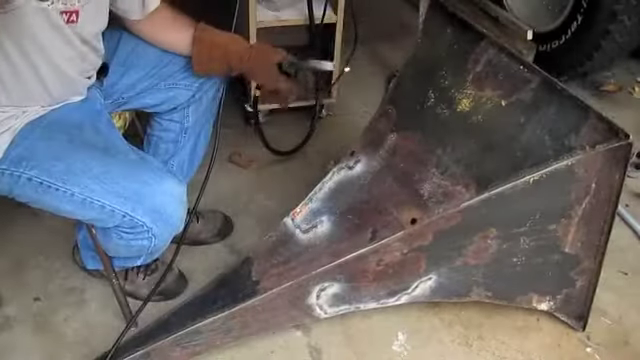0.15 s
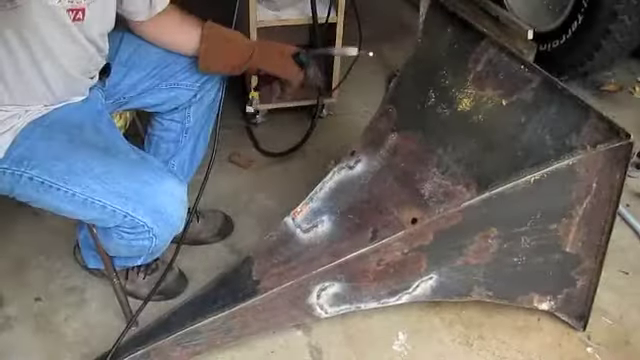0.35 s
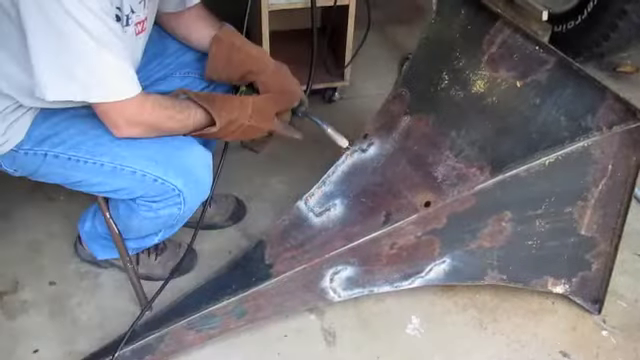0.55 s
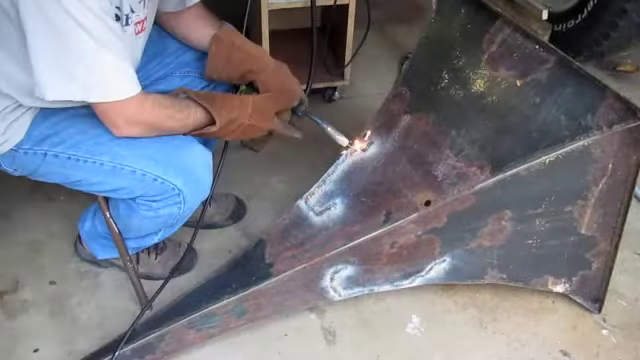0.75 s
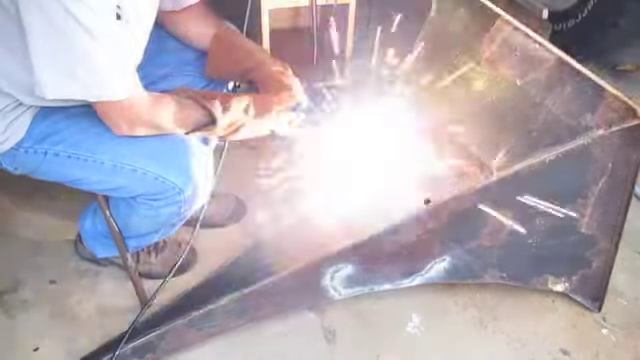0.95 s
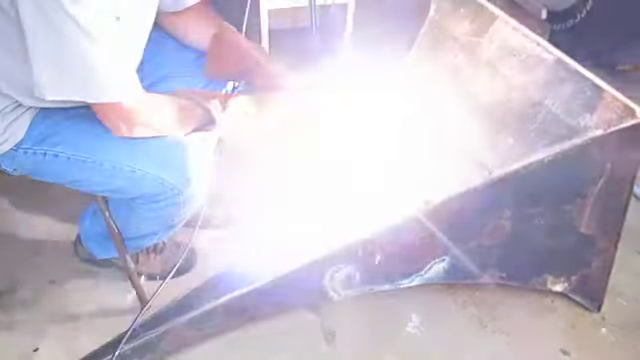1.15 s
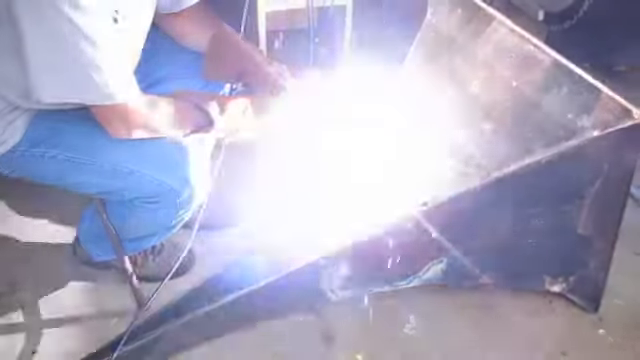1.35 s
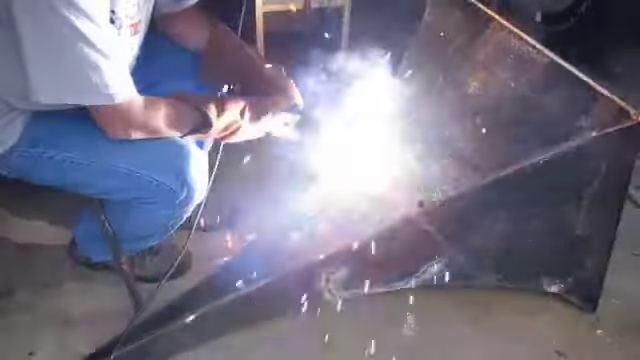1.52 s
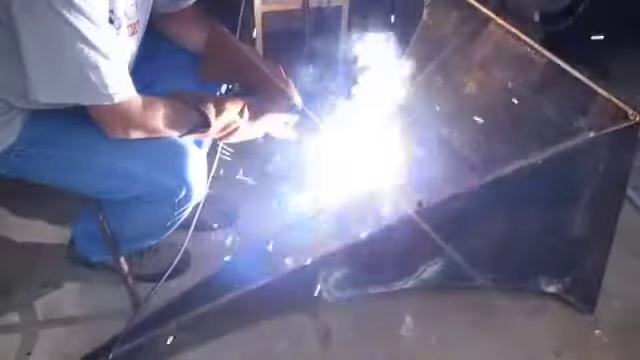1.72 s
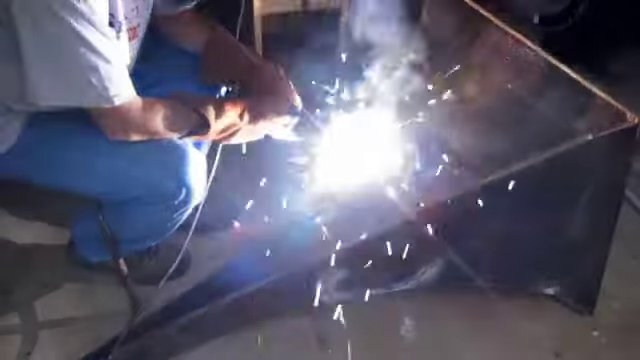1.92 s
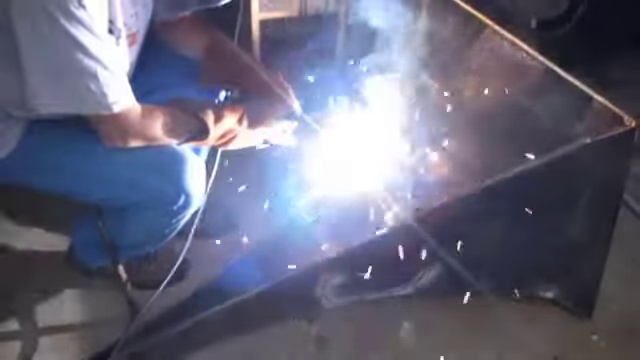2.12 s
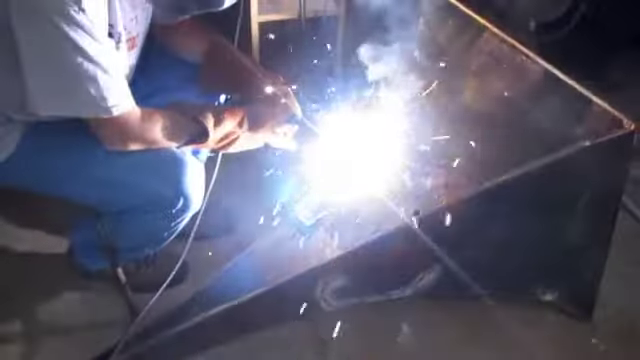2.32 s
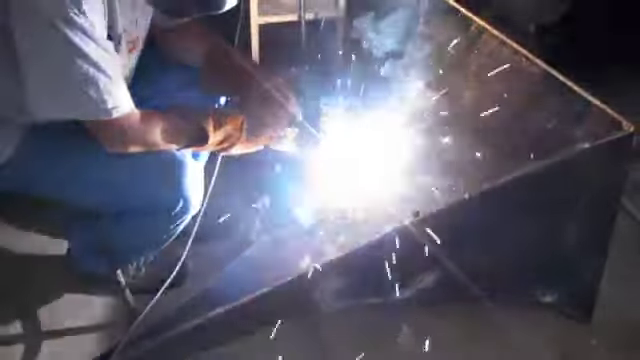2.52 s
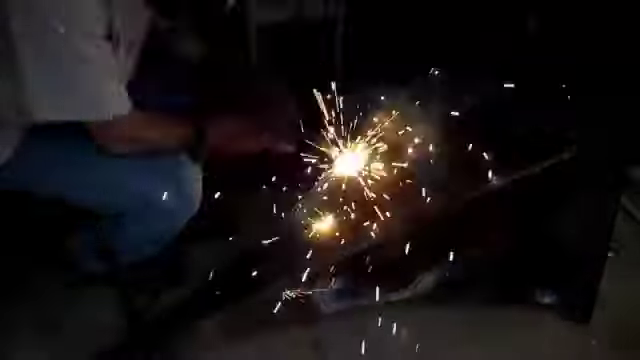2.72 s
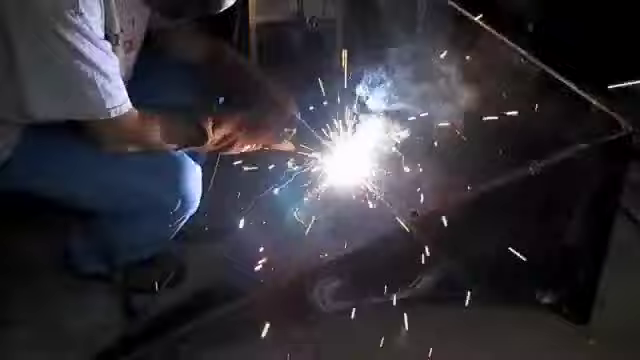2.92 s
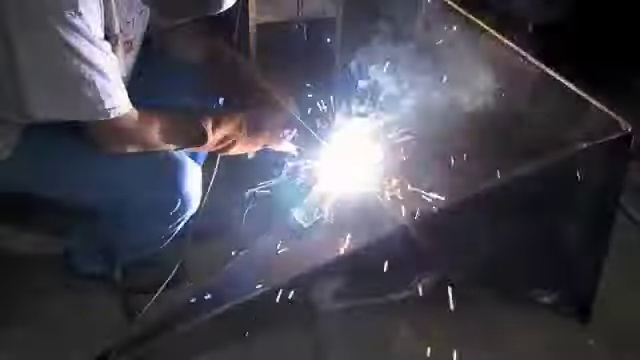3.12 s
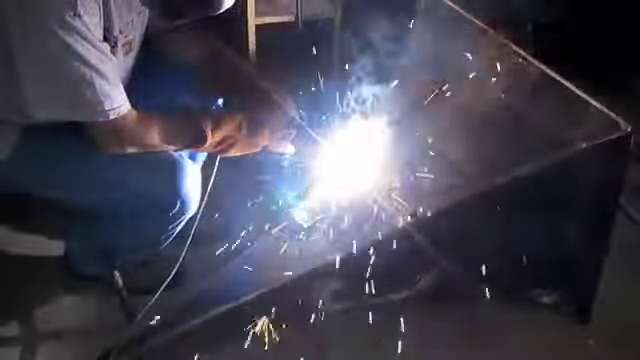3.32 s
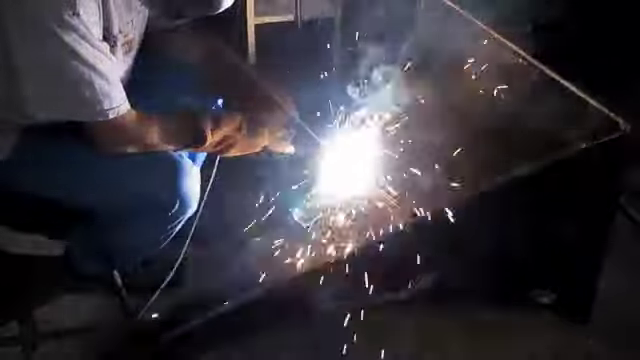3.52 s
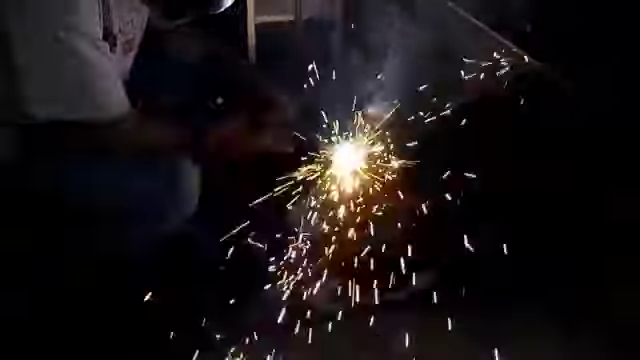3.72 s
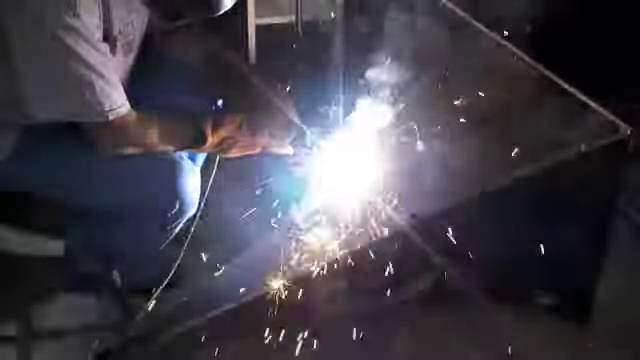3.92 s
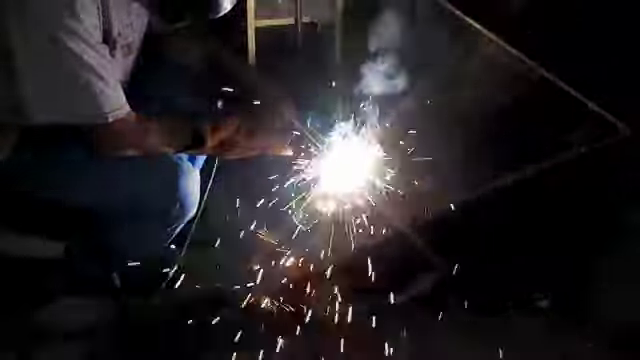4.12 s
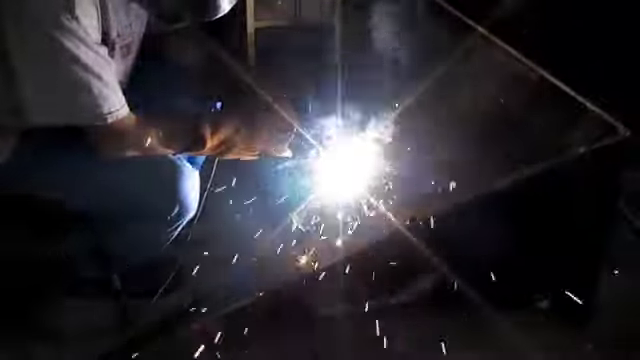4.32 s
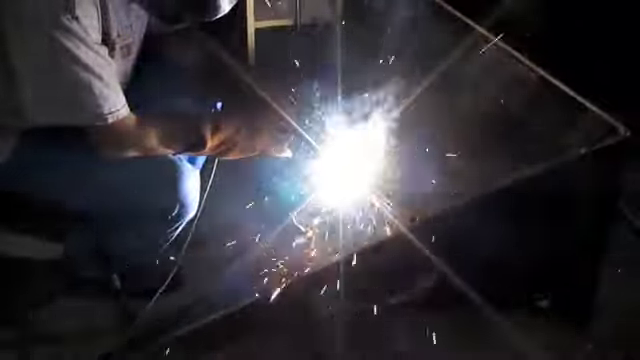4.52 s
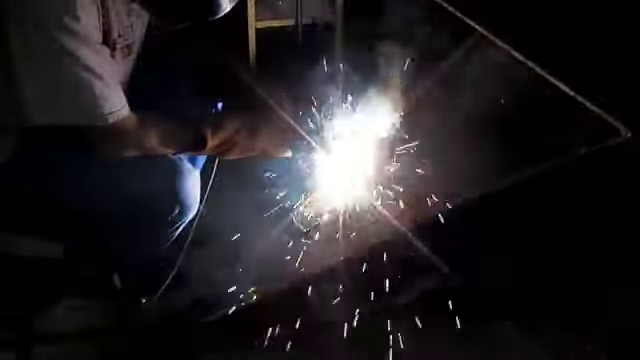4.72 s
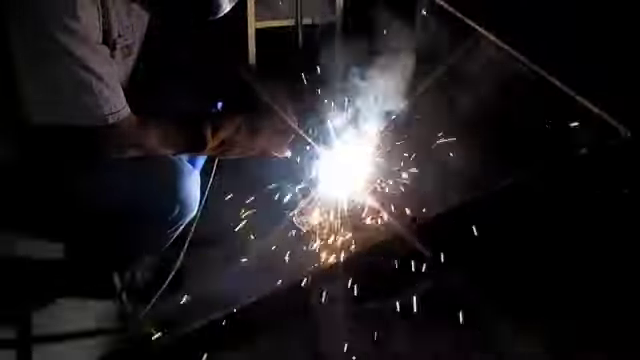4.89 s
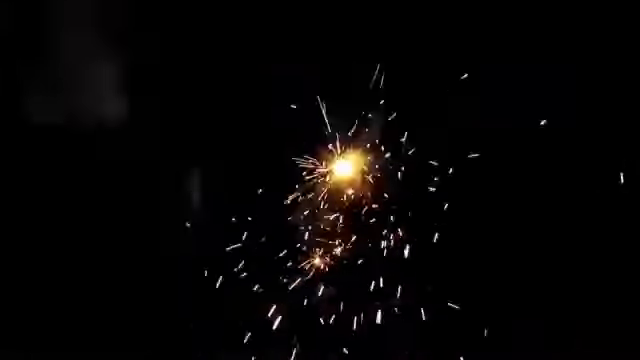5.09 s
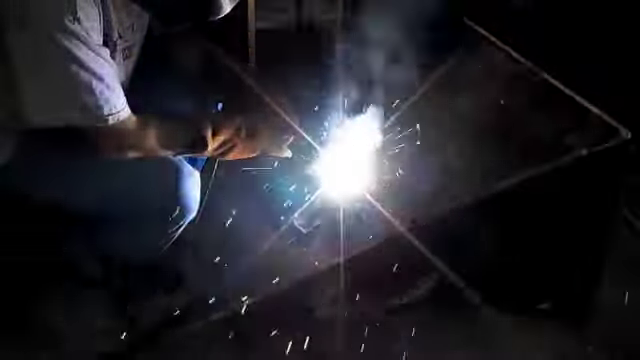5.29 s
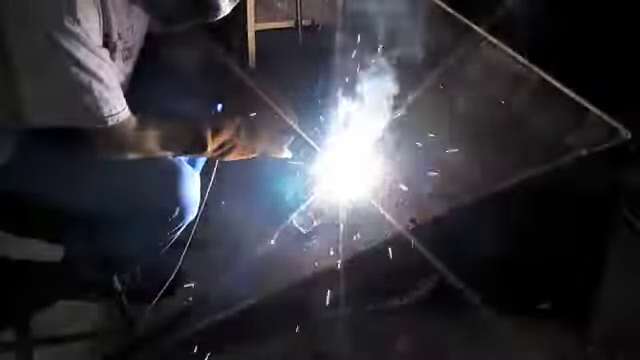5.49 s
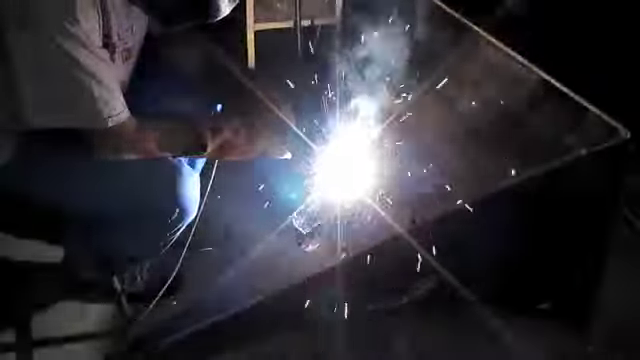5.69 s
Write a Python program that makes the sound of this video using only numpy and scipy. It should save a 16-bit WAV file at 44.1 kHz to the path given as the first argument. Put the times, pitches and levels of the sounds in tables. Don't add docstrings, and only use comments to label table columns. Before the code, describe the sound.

After under a second of soft fan air, a wire-feed welder strikes and spits harsh buzzing crackle and hard pops on ringing sheet steel.

```python
import sys
import numpy as np
from scipy import signal
from scipy.fft import rfft, irfft
from scipy.io import wavfile

SR = 44100
rng = np.random.default_rng(int(sys.argv[2]) if len(sys.argv) > 2 else 0)


def gain_from_db(level_db):
    decades = np.asarray(level_db, float) / 20
    return 10 ** decades


def materialize(psi):
    bounded = np.clip(np.atleast_2d(psi).T, -1, 1)
    quanta = np.round(bounded * 32767).astype(np.int16)
    wavfile.write(sys.argv[1], SR, quanta)


N = 253575
MAINS_HZ = 120


def evened(x):
    return x / np.sqrt(np.mean(x ** 2) + 1e-20)


def read(points, hz):
    f, value = np.transpose(points)
    return np.interp(np.log(hz + 1), np.log(f + 1), value)


def curve(rows, column):
    rows = np.array(rows)
    return np.interp(np.arange(N) / SR, rows[:, 0], rows[:, column])


def wander(cutoff_hz, count=1):
    b, a = signal.butter(2, cutoff_hz, fs=SR)
    return evened(signal.lfilter(b, a, rng.standard_normal((count, N))))


def paired(x, likeness):
    a, b = rfft(x)
    c = np.clip(read(likeness, np.fft.rfftfreq(x.shape[1], 1 / SR)), 0, 1)
    shared, opposed = np.sqrt((1 + c) / 2), np.sqrt((1 - c) / 2)
    return irfft([shared * a + opposed * b, shared * a - opposed * b], x.shape[1])


def bells(rows, hz):
    return sum(db / (1 + (2 * (hz - f) / width) ** 2) for f, width, db in rows)


# (time [s], level [dB])
FAN_LEVEL = [
    (0, -56),
    (.1, -55),
    (.45, -52),
    (.66, -53),
    (.86, -50.5),
    (.9, -54),
]
# (frequency [Hz], level [dB])
FAN_AIR_SPECTRUM = [(40, -37), (200, -19), (300, -10), (550, -14.5), (1300, -17.5), (2900, -21.5),
                    (4000, -28.5), (9000, -35.5), (15000, -54)]
# (frequency [Hz], level [dB])
BLADE_TONES = [(360.7, -57), (549.1, -47.5), (823.6, -47), (1098, -53.5), (1378, -55.5), (1647, -51.5),
               (2196, -59), (2476, -57), (2751, -64)]
# (frequency [Hz], coherence [0-1])
FAN_COHERENCE = [(60, 0.29), (380, 0.76), (2380, 0.44), (15000, 0.44)]


def fan():
    noise = rng.standard_normal((2, N))
    colour = gain_from_db(read(FAN_AIR_SPECTRUM, np.fft.rfftfreq(N, 1 / SR)))
    air = evened(paired(irfft(rfft(noise) * colour, N), FAN_COHERENCE))
    warped_s = np.cumsum(1 + 0.0139 * wander(24.6)[0]) / SR
    flutter = gain_from_db(3 * wander(30, count=len(BLADE_TONES)))
    tones = 0
    for (hz, db), gain in zip(BLADE_TONES, flutter):
        phase = 2 * np.pi * (hz * warped_s + rng.random((2, 1)) * 0.1)
        tones = tones + gain_from_db(db + 55.0) * gain * np.sin(phase)
    return gain_from_db(curve(FAN_LEVEL, 1)) * (gain_from_db(5.0) * air + 0.46 * tones)


# (time [s], peak level [dB])
CONTACTOR = [
    (0.813, -27),
]


def contactor():
    return CONTACTOR[0]


# (dying time [s], striking time [s], depth [dB], pop peak [dB])
STALLS = [(1.031, 1.117, -14.5, -15), (1.114, 1.158, -5, -7), (1.151, 1.198, -4, -10),
          (1.22, 1.244, 2.5, 1), (1.385, 1.425, -20, -1.5), (1.419, 1.486, -5, -4.5), (1.504, 1.552, -3, 0),
          (1.553, 1.6155, -18, -17), (1.628, 1.7156, -2.5, -2.5), (1.89, 1.9364, -7, -6),
          (1.944, 1.9958, -6, -3.5), (1.993, 2.0827, -6, -0.5), (2.295, 2.3407, -8, -6.5),
          (2.338, 2.372, -4, -10), (2.426, 2.4569, -5, -4), (2.643, 2.7146, -12, -3.5),
          (2.722, 2.7525, -6.5, -5.5), (2.834, 2.842, -8, -2), (2.867, 2.895, -7, -2.5),
          (2.905, 2.956, -19, -7), (3.003, 3.0513, -11, -4.5), (3.064, 3.0966, -9, -6.5),
          (3.125, 3.1674, -16, -13), (4.153, 4.18, -7, -6.5), (3.5, 3.5663, -2, -1.5),
          (3.59, 3.6676, -0.5, -10), (3.774, 3.8537, -3, -1), (5.063, 5.157, -11.5, -27),
          (5.24, 5.2778, -13, -9.5), (5.273, 5.33, -4, -5)]


def stall_db():
    fade_share = 0.84
    drop = np.zeros(N)
    for out, back, db, pop in STALLS:
        a, b = int(out * SR), int(back * SR)
        drop[a:b] = db * np.minimum(np.linspace(0, 1 / fade_share, b - a), 1)
    return drop


# (time [s], crackle level [dB], transformer hum level [dB], low body against high snap [dB])
BURNING = [(0.81, -21.5, -83.5, -2), (0.835, -34.5, -79, -2), (0.86, -39, -73, 3.7), (0.885, -21, -64, 0.5),
           (1.03, -19.5, -65, 2), (1.22, -21, -66, -0.85), (1.5, -21.5, -67, 1.5), (1.68, -22.5, -69, -1),
           (2.15, -20, -71, 0), (2.87, -20, -67, -0.4), (3.25, -18.5, -65, 0), (3.4, -23.5, -68, -1.5),
           (3.75, -22, -67.5, -0.5), (4.15, -22.5, -67, -1), (4.35, -22, -63, -1),
           (4.85, -16.5, -63.5, -0.44), (5.18, -24, -68, 0.8), (5.75, -20, -65, -1.5)]
# (middle time [s], half length [s], lift [dB])
SURGES = [(0.936, 0.015, 5.5), (1.238, 0.013, -7.5), (1.35, 0.045, 4.5), (1.626, 0.0086, 5.5),
          (1.776, 0.025, 4.5), (1.84, 0.02, 7), (2.079, 0.017, 2), (2.198, 0.011, 6.5), (2.524, 0.01, 6),
          (2.649, 0.012, 2.5), (2.851, 0.014, 2), (3.191, 0.018, 3.5), (3.265, 0.009, -2),
          (3.675, 0.005, 8.5), (3.713, 0.0075, 11), (3.755, 0.0062, 6.5), (3.929, 0.044, 5),
          (3.996, 0.014, 1), (4.192, 0.061, 5), (4.436, 0.017, 6), (4.54, 0.022, 3), (4.73, 0.013, 1),
          (4.842, .03, 0), (4.94, .025, 1.5), (5.047, 0.014, -2), (5.213, .015, 7.5), (5.45, 0.023, 7),
          (5.539, 0.011, 6), (5.677, 0.018, 5), (5.74, 0.014, 8.5)]


def heat_db():
    t = np.arange(0, N / SR, .001)
    lift = sum(db * np.exp(-((t - s) / half) ** 2) for s, half, db in SURGES)
    return curve(BURNING, 1) + np.interp(np.arange(N) / SR, t, lift)


def transformer():
    turn = 2 * np.pi * MAINS_HZ * np.arange(N) / SR + np.array([[0], [.6]])
    switched_on = np.arange(N) > contactor()[0] * SR
    load = gain_from_db(curve(BURNING, 2) + 1.5 * stall_db() + 4.5) * switched_on
    return np.sqrt(2) * load * (np.sin(turn) + gain_from_db(3.5) * np.sin(2 * turn + 0.28))


# (time [s], level [dB])
THUMPS = [(0.8695, -52), (0.9509, -47), (1.1579, -53), (1.3706, -53), (1.4251, -43), (1.5015, -59),
          (1.714, -58.5), (2.0116, -53), (2.162, -59), (2.3001, -46), (2.457, -50), (2.7173, -53),
          (2.768, -53), (2.894, -40.5), (3.116, -54), (3.2655, -50), (3.8513, -49), (4.3196, -54),
          (4.5127, -49), (4.7339, -61), (5.019, -46), (5.467, -52), (1.2458, -60), (3.5658, -63),
          (3.678, -61), (4.1337, -61), (4.585, -58), (4.8514, -61)]


def thumps():
    s, db = np.transpose(THUMPS)
    side_db = 5 * rng.standard_normal(len(s))
    hits = np.zeros((2, N))
    hits[:, np.round(s * SR).astype(int)] = gain_from_db(db + 39.5 + side_db * [[.5], [-.5]])
    u = np.arange(1200) / SR / 0.000091
    push = signal.lfilter(*signal.butter(1, 35, "high", fs=SR), u * np.exp(-u))
    return signal.oaconvolve(hits, [push], axes=1)[:, :N]


SNAP_PHASE = 0.18


def snaps():
    chance, scatter_cycles, first_strike_s = 0.34, 0.21, 0.87
    smallest_db, spread_db, heat_share, top_db = -13, 3, 0.83, -4.5
    draw = rng.random((int(N / SR * MAINS_HZ) * 2 - 4, 2))
    crest_number = np.arange(len(draw)) // 2 + 1
    s = (crest_number + SNAP_PHASE + scatter_cycles * rng.standard_normal(len(draw))) / MAINS_HZ
    at = np.clip(s * SR, 0, N - 9).astype(int)
    swing_db = (heat_db() + 21)[at]
    live = (draw[:, 0] < chance * gain_from_db(.6 * swing_db)) & (s > first_strike_s)
    excess = np.minimum(-np.log(draw[:, 1]), 2.4)
    size_db = np.minimum(top_db, smallest_db + spread_db * excess + heat_share * swing_db)
    return list(zip(at / SR, np.where(live, size_db + 1.97 * stall_db()[at], -99)))


# (time [s], peak level [dB], low body against high snap [dB])
POPS = [(0.8702, -7.5, -9), (0.8754, 0, -8), (0.9024, -6, -1), (0.9373, -2, -5.5), (0.9507, -6, -5),
        (0.9542, 0, -2), (1.0144, -7.5, 11), (1.367, -0.5, -2), (1.5031, -5.5, 3), (2.0112, -5.5, -1),
        (2.1639, -5, -3), (2.3, -2, -1), (2.6465, -4, -2), (2.7843, -10, -15), (2.8526, 1, -4),
        (3.1757, -8, -9), (3.2652, -1, -5), (3.2707, -2.5, -1), (4.015, -1, 16), (4.226, -1, 8.5),
        (4.2849, -3.5, -3), (4.3016, -3.5, 3), (4.3206, -3.5, -4.5), (4.5127, -2, 7), (4.777, -14, 5),
        (4.8514, -3, -16), (5.02, -1, -3), (5.2155, -2, 7), (5.4638, -7, 2), (5.576, -5.5, -9)]


def pulses():
    t = np.arange(N) / SR
    events = [row[:2] for row in POPS] + [row[1::2] for row in STALLS] + snaps() + [contactor()]
    s, peak_db = np.transpose(events)
    body_db, side = rng.standard_normal((len(s), 2)).T
    body_db = np.r_[[row[2] for row in POPS], 4.5 * body_db[len(POPS):] - 2.5]
    body_db = np.clip(body_db, -10, 7)
    body_db[-1] = 3
    s = s + rng.uniform(-6e-5, 6e-5, len(s))
    at = np.round(s * SR).astype(int) - 2
    crest = np.clip(1 + 0.99 * np.cos(2 * np.pi * (MAINS_HZ * t - SNAP_PHASE)), 0, 3)
    fires = rng.random(N) < 450 / SR * crest
    small = fires * gain_from_db(2.4 * np.minimum(rng.exponential(1, N), 3.0))
    sizzle = 0.061 * crest * rng.standard_normal(N)
    burn = gain_from_db(heat_db() + stall_db() + 5.0 + 1.3 * wander(40)[0]) * (t > contactor()[0])
    body, snap, lean = (small + sizzle) * burn * gain_from_db(2.5 * wander(2100, count=3))
    lean = 0.077 * lean * rng.standard_normal(N)
    np.add.at(body, at, gain_from_db(peak_db + 9.0 + 0.14 * body_db))
    np.add.at(snap, at, gain_from_db(peak_db + 6.0 - 0.53 * body_db))
    np.add.at(lean, at, 0.23 * side * gain_from_db(peak_db + 2.5))
    return body * gain_from_db(curve(BURNING, 3)), snap + lean * [[1], [-1]]


def causal(gain_db):
    log = np.log(gain_from_db(np.maximum(np.r_[gain_db, gain_db[-2:0:-1]], -100)))
    h = np.fft.ifft(np.exp(np.conj(signal.hilbert(log)))).real[:2048]
    return h / abs(signal.hilbert(h)).max()


# (frequency [Hz], level [dB])
BURST_SPECTRUM = [(35, -91), (60, -44), (287, -19), (398, -10.5), (480, -19.5), (527, -12), (1060, -6),
                  (1470, -4.5), (2090, 4.5), (4120, -13), (5090, -9), (6740, -4.5), (9570, -2),
                  (12100, -8.5), (16000, -23.5)]
# (frequency [Hz], width [Hz], unused level [dB])
SHEET_MODES = [(399, 27, -11), (829, 73, -8), (1096, 180, -4), (1687, 45, -2), (2050, 2120, 0),
               (2693, 150, -1), (2900, 9.9, -6), (3480, 32, -5), (5180, 190, -4)]


def burst():
    hz = np.fft.rfftfreq(8192, 1 / SR)
    modes = [(f, width, 3.0) for f, width, db in SHEET_MODES]
    whole = causal(read(BURST_SPECTRUM, hz) + bells(modes, hz))
    low = signal.lfilter(*signal.butter(2, 4400, fs=SR), whole)
    swell = np.r_[np.zeros(5), low]
    return swell, whole - low


def taps(size):
    out, first = np.zeros((2, size)), np.arange(6, size - 12, 12)
    at = first + rng.integers(0, 12, (2, len(first)))
    np.put_along_axis(out, at, rng.choice([-1., 1.], at.shape), 1)
    return out


# (frequency [Hz], coherence [0-1])
ECHO_COHERENCE = [(60, 0.45), (180, 1), (550, 0.87), (1650, 0.96), (4970, 0.75), (15000, 0.22)]


def bounces(level_db=-4, fade_s=0.0008):
    early = taps(size=256) * np.exp(-np.arange(256) / SR / fade_s)
    out = paired(gain_from_db(level_db) * early / np.linalg.norm(early[0]), ECHO_COHERENCE)
    out[:, :4] = [1, 0, 0, 0]
    return out


# (frequency [Hz], reverberation time t60 [s])
GARAGE_DECAY = [(150, 0.3), (800, 0.25), (2500, 0.23), (6000, 0.15), (14000, 0.17)]


def room(level_db=-2.5):
    hz, t, z = signal.stft(taps(size=SR // 2), SR, nperseg=128)
    rise = 1 - np.exp(-t / 0.00022)
    decay = gain_from_db(-60 * t / read(GARAGE_DECAY, hz)[:, None])
    tail = signal.istft(z * rise * decay, SR, nperseg=128)[1]
    return paired(gain_from_db(level_db) * tail / np.linalg.norm(tail[0]), ECHO_COHERENCE)


def reverberant(dry):
    turn = np.pi * (1.302 * np.arange(N) / SR + np.arange(3)[:, None] / 3)
    shares = np.sqrt(2 / 3) * np.cos(turn)
    steady = signal.lfilter(*signal.butter(2, 3600, fs=SR), dry)
    dry = dry - 0.43 * steady
    echo = 0.57 * signal.oaconvolve(steady, room(), axes=1)[:, :N]
    return echo + sum(signal.oaconvolve(dry * share, room(), axes=1)[:, :N] for share in shares)


def arc():
    body, snap = pulses()
    swell, crack = burst()
    spots = 12
    spot = rng.integers(0, spots, N)
    near, dry = np.zeros((2, 2, N))
    for k in range(spots):
        part = signal.oaconvolve(body * (spot == k), swell)[:N]
        part = part + signal.oaconvolve(snap * (spot == k), [crack], axes=1)[:, :N]
        near += signal.oaconvolve(part, bounces(), axes=1)[:, :N]
        dry += part
    near += reverberant(dry)
    deep = signal.filtfilt(*signal.butter(1, 800, fs=SR), near)
    return near + deep * (gain_from_db(1.4 * curve(BURNING, 3)) - 1)


def scene():
    return fan() + transformer() + thumps() + arc()


# (frequency [Hz], width [Hz], level [dB])
HOUSING_DIPS = [(176, 20, 0.5), (4167, 33, -12), (6697, 1110, -14)]
# (frequency [Hz], left-right difference [dB])
PORT_BALANCE = [(60, -8), (180, 1), (550, -0.5), (1650, 1), (4970, -2), (15000, 0.5)]


def microphone(x):
    hz = np.fft.rfftfreq(2 * N, 1 / SR)
    half_db = np.clip(read(PORT_BALANCE, hz), -3, 3) / 2
    x = irfft(rfft(x, 2 * N) * gain_from_db(bells(HOUSING_DIPS, hz) + [half_db, -half_db]))[:, :N]
    x = 1.22 * np.tanh(x / 1.383)
    return x + signal.lfilter(*signal.butter(1, 18, "high", fs=SR), 0.031 * x ** 2)


# (start [s], quietest [s], end [s])
BRIEF_FADE = (0.44, 0.551, 0.65)


def brief_fade(x):
    return x * np.interp(np.arange(N) / SR, BRIEF_FADE, [1, .04, 1])


def band_limit(x):
    return signal.sosfilt(signal.butter(12, 16480, fs=SR, output="sos"), x)


def record(dry):
    x = brief_fade(microphone(dry))
    mix = signal.oaconvolve(x, signal.firwin(201, 16350, fs=SR)[None], "same")
    return band_limit(mix)


dry = scene()
out = record(dry)
materialize(out)
```